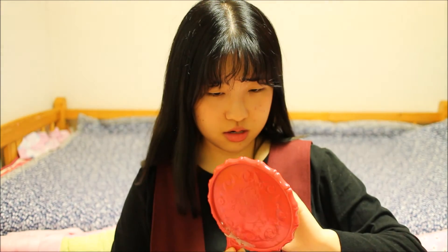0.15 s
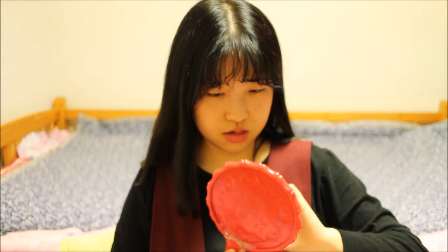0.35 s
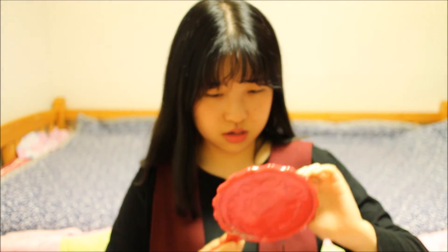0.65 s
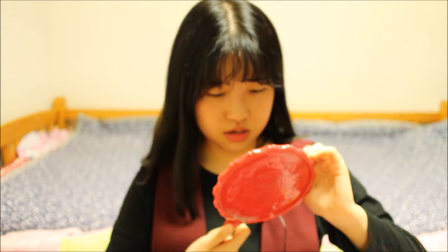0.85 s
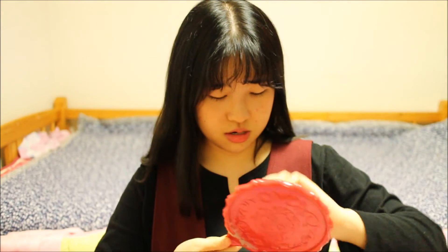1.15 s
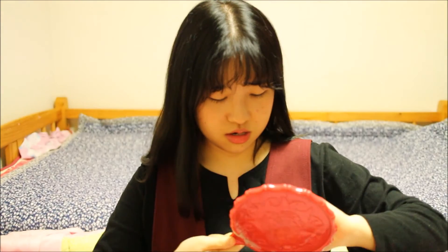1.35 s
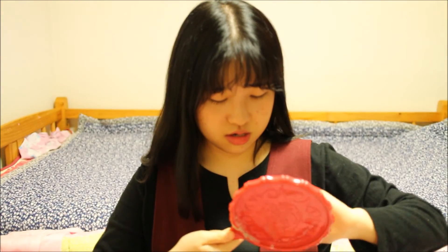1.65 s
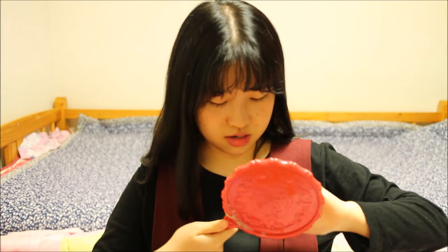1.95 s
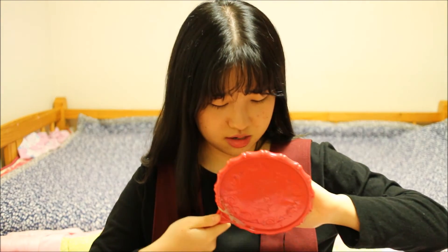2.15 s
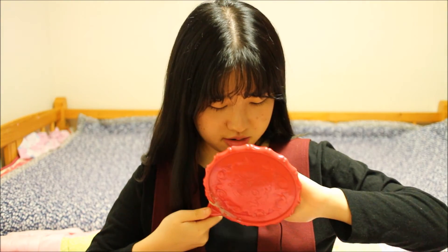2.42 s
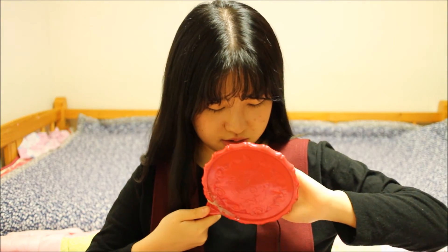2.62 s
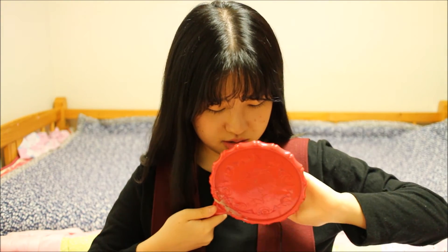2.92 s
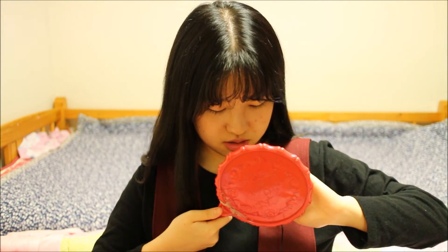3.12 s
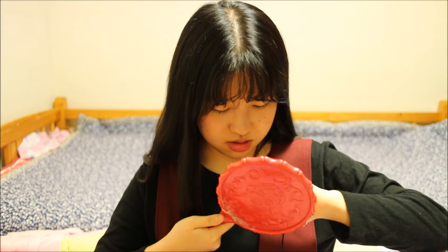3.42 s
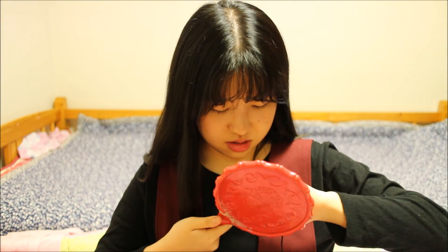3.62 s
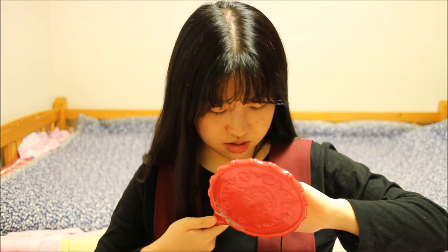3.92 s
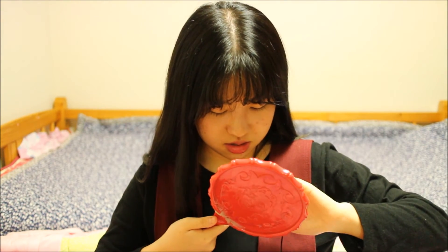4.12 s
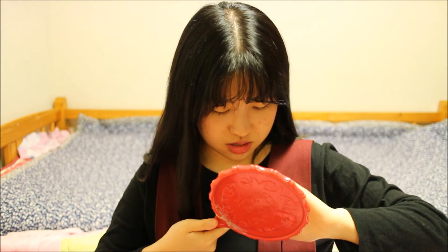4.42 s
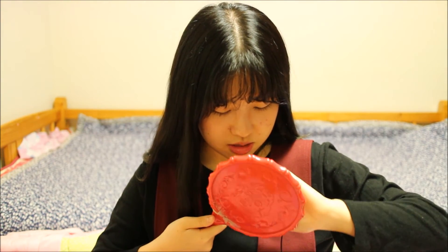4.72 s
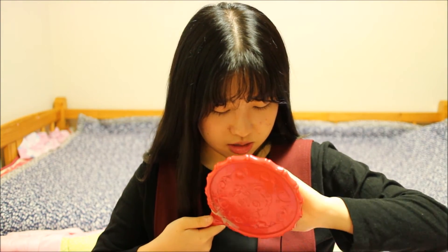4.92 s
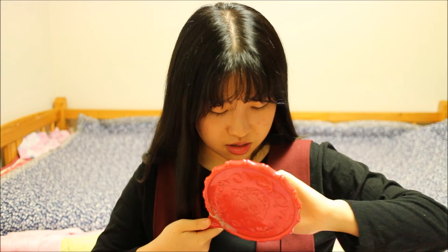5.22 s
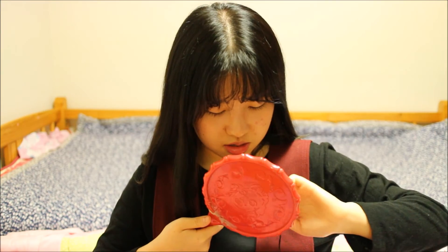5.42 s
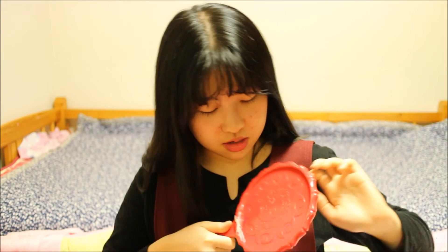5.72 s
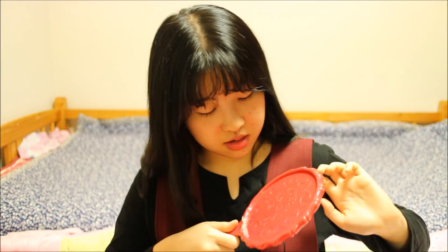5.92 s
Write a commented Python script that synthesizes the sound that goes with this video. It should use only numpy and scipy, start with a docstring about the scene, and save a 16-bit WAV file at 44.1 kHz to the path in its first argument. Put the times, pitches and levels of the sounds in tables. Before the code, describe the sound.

Fingernails tap the back of a plastic hand mirror in quick rolls of two or three, each a sharp click over a small hollow knock. After a short early pause with a faint finger slide and squeak, the tapping resumes, mixed with a few duller fingertip thuds. It ends with a soft sleeve rustle and a faint creak of the grip. The stereo microphone is close, in a quiet bedroom.

```python
"""Quick rolls of fingernail taps (ring, middle, index) sound on the back of a plastic hand mirror,
close to a stereo microphone in a quiet bedroom. Each impact excites three groups of damped modes:
the held mirror rocks, its plate rings and the nail adds a bright click; some taps land on the soft pad.
In the pause a finger slides over the plastic with a faint squeak. A sleeve rustles then and at the end,
when stick-slip friction makes the grip creak as the mirror is turned."""
import sys
import numpy as np
from scipy import signal
from scipy.fft import rfft, irfft
from scipy.io import wavfile

SR = 44100
rng = np.random.default_rng(int(sys.argv[2]) if len(sys.argv) > 2 else 0)


def dump_mix(stems):
    """Bounce the given channels to the path in sys.argv[1] as a 16-bit WAV at rate SR."""
    frames = np.atleast_2d(stems).T  # one column per channel
    limited = np.clip(frames, -1, 1)  # hard clip at full scale
    pcm = np.round(limited * 32767).astype(np.int16)
    wavfile.write(sys.argv[1], SR, pcm)


N = 267550
TAP_SIZE = 4096   # samples in one tap, which is built as a spectrum
TAP_HZ = np.arange(TAP_SIZE // 2 + 1) * SR / TAP_SIZE
SCENE_HZ = np.arange(N // 2 + 1) * SR / N
TIME = np.arange(N) / SR
SIDES = np.array([[1], [-1]])   # left, right


def from_db(db):
    """Amplitude ratio of a level: a factor of ten for every 20 dB."""
    return 10 ** (np.asarray(db) / 20)


def rms_one(x):
    """Normalisation to unit mean power."""
    return x / np.sqrt(np.mean(x ** 2) + 1e-20)


def at_hz(points, hz, column=1):
    """Interpolation of a table column over logarithmic frequency."""
    table = np.array(points)
    return np.interp(np.log(hz + 1e-9), np.log(table[:, 0]), table[:, column])


def coloured(x, spectrum):
    """Spectral shaping by a level curve, at unit rms."""
    return rms_one(irfft(rfft(x) * from_db(at_hz(spectrum, SCENE_HZ)), N))


def stereo_noise(coherence):
    """Partially coherent white noise: the sum and difference of two independent noises."""
    mid, side = rfft(rng.standard_normal((2, N)))
    return irfft(np.sqrt(1 + coherence) * mid + np.sqrt(1 - coherence) * side * SIDES, N)


def swells(rows):
    """Amplitude envelope of smooth movements: a sum of Gaussian bells."""
    return sum(from_db(db) * np.exp(-((TIME - s) / half_s) ** 2) for s, half_s, db in rows)


def panned(db, pan_db):
    """Left and right gain: a level difference gives direction."""
    return from_db(db + SIDES * pan_db / 2)


def noise_floor(level_db=-62.5):
    """Stationary noise: room rumble, partly coherent at the two capsules, and incoherent microphone hiss."""
    # spectral density: f/Hz, relative level/dB
    spectrum = [(20, 5.5), (58, -10), (150, -12.5), (390, -18), (480, -15.5), (600, -16.5), (760, -12.5),
                (1000, -20), (1600, -20), (2400, -21.5), (8000, -23), (16000, -25)]
    # likeness of left and right: f/Hz, coherence
    coherence = [(60, 0.69), (180, 0.28), (550, 0.27), (1650, 0.23), (4970, 0.00725), (15000, 0.01)]
    return from_db(level_db) * coloured(stereo_noise(at_hz(coherence, SCENE_HZ)), spectrum)


def bedroom(x, first_s=.004, early_t60=0.037, build_s=0.0076):
    """Reverberation: dense early reflections from bed and walls, then a short, faint exponential tail."""
    # room response: f/Hz, early level/dB, tail level/dB, tail T60/s
    room = [(100, -29.5, -35, .3), (300, -31, -35, .3), (500, -18, -22.5, 0.41), (740, -12.5, -27, 0.24),
            (880, -24.5, -16, 0.17), (1010, -17, -16.5, 0.24), (1360, -18, -21, 0.12),
            (2330, -12, -22, 0.2), (4000, -23.5, -21, 0.08), (9000, -23.5, -26.5, 0.22),
            (16000, -25, -23, 0.11)]
    t = np.arange(SR // 2) / SR
    age = np.maximum(t - first_s, 0)
    edges_hz = np.geomspace(60, 17000, 25)
    white, echo = rng.standard_normal((2, 2, len(t))), 0
    for k, (low, high) in enumerate(zip(edges_hz, edges_hz[1:])):
        hz = np.sqrt(low * high)
        early_db, tail_db, tail_t60 = (at_hz(room, hz, column) for column in (1, 2, 3))
        band = signal.butter(2, [low, high], "band", fs=SR, output="sos")
        mid, side = signal.sosfilt(band, white[k % 2])
        coherence = 1 / (1 + (hz / 2500) ** 2)   # close capsules hear long waves alike
        diffuse = np.sqrt(1 + coherence) * mid + np.sqrt(1 - coherence) * side * SIDES
        early = rms_one((age > 0) * from_db(-60 * age / early_t60)) * from_db(early_db)
        tail = rms_one((1 - np.exp(-age / build_s)) * from_db(-60 * age / tail_t60)) * from_db(tail_db)
        echo = echo + np.hypot(early, tail) * diffuse
    return signal.fftconvolve(x.mean(0)[None], echo / np.sqrt(2 * len(t)), axes=1)[:, :N]


def standing_wave(x):
    """Resonance: one room mode hums on faintly after the taps."""
    # room mode: f/Hz, level/dB, T60/s
    mode = (540, -77, .7)
    hz, db, t60 = mode
    t = TIME[:SR]
    return signal.fftconvolve(x.mean(0), from_db(db - 60 * t / t60) * np.sin(2 * np.pi * hz * t))[:N]


def sleeve(folds_per_s=55, rub=0.03):
    """Shot noise: cloth gives way in soft, dull, random flicks over a steady rub."""
    # sleeve movements: centre t/s, half width/s, level/dB
    rustles = [(.57, 0.042, -64), (.93, .1, -72), (5.75, .035, -60), (5.86, 0.037, -64), (5.96, .05, -67.5)]
    # spectrum of the cloth: f/Hz, relative level/dB
    spectrum = [(25, -18.5), (60, 11), (150, 2.5), (330, -9.5), (470, -17), (720, -5), (980, -43),
                (2000, -38)]
    flicks = (rng.random(N) < folds_per_s / SR) * rng.uniform(.5, 1, N)
    return swells(rustles) * coloured(flicks + rub * stereo_noise(0.46), spectrum)


def finger_slide():
    """Sliding friction: skin on plastic gives a faint, high hiss."""
    # strokes of the finger: centre t/s, half width/s, level/dB
    strokes = [(.6, .05, -74), (.69, 0.045, -67.5), (.82, 0.12, -77), (1.0, .02, -69.5)]
    # spectrum of the friction: f/Hz, relative level/dB
    spectrum = [(1500, -29), (2200, -3.5), (4000, -26), (7000, -7.5), (9200, -1), (12000, -12.5),
                (16000, -26.5)]
    return swells(strokes) * coloured(stereo_noise(0.5), spectrum)


def squeak(pitch_hz=320, width_hz=25):
    """Stick-slip of skin on the handle: a brief tone of narrow-band noise."""
    # rub on the handle: centre t/s, half width/s, level/dB
    rubs = [(.925, 0.031, -64)]
    resonance = signal.iirpeak(pitch_hz, pitch_hz / width_hz, fs=SR)
    return swells(rubs) * rms_one(signal.lfilter(*resonance, rng.standard_normal(N)))


def mode_spectra(hz, db, t60):
    """Damped oscillators: the spectrum of each mode's decaying cosine, one row a mode."""
    s = 2j * np.pi * TAP_HZ + np.log(1000) / t60[:, None]
    return SR * from_db(db[:, None]) * s / (s ** 2 + (2 * np.pi * hz[:, None]) ** 2)


def finger_push(contact_ms, lead_s=0.000076, skew=0.68):
    """Forced response: a fast-rising force pulse rocks the mirror; longer contact sounds duller."""
    # the whole mirror rocking in the hand: f/Hz, level/dB, T60/s
    grip_modes = [(114.3, -31, 0.051), (204, -20.5, 0.015), (340, -19.5, 0.012), (440.7, -30, 0.037),
                  (503, -25.5, 0.031)]
    progress = np.minimum(np.arange(TAP_SIZE) / (contact_ms / 1000 * SR), 1)
    force = np.sin(np.pi * progress ** skew)
    rocking = mode_spectra(*np.transpose(grip_modes)).sum(0)
    return rocking * rfft(force / force.sum()) * np.exp(2j * np.pi * TAP_HZ * lead_s)


def grip_creak(gap_s=.024, jitter=.3, contact_ms=2.3, spread_db=5.0, count=300):
    """Stick-slip: as the mirror turns, the skin slips at uneven intervals, each a tiny, dull shove."""
    # turn in the holding fingers: centre t/s, half width/s, slip level/dB
    turn = [(5.87, 0.14, -32.5)]
    timing, strength = rng.standard_normal((count, 2)).T
    from_end = (np.cumsum(gap_s * np.exp(jitter * timing)) * SR).astype(int)
    inside = from_end < N
    slips = np.zeros(N)
    slips[N - 1 - from_end[inside]] = from_db(spread_db * strength[inside])
    return signal.fftconvolve(slips * swells(turn), irfft(finger_push(contact_ms, lead_s=0)))[:N]


def plate_ring(tilt_db, rim_db, scatter_db=2.25, detune=.008, damping_spread=0.04, cutoff_hz=1131):
    """Bending modes: the struck spot weights them, the finger retunes and damps them."""
    # modes of the plastic back: f/Hz, level/dB, T60/s
    plate_modes = [(734.4, -18.5, 0.031), (799, -12, 0.02), (953.5, -12, 0.038), (1068, -19, 0.025),
                   (1184, -9, 0.019), (1300, -20.5, .014), (1553, -12, .009), (1805, -24, 0.037),
                   (1949.5, -17.5, 0.028), (2070, -29.5, 0.0078), (2420, -33.5, 0.01)]
    hz, db, t60 = np.transpose(plate_modes)
    shift, damping, common, left, right = rng.standard_normal((5, len(hz)))
    modes = mode_spectra(hz * (1 + detune * shift), db, t60 * np.exp(damping_spread * damping))
    slope_db = tilt_db * np.log2(np.minimum(hz, 1900) / 1000)
    rim_band = np.exp(-((hz - 1921) / 100) ** 2)
    spot_db = slope_db + (rim_db - tilt_db) * rim_band   # the rim ring is nearly free of the tilt
    weights = from_db(spot_db + scatter_db * (common + .5 * np.array([left, right])))
    s = 1j * TAP_HZ / cutoff_hz
    return weights @ modes / (1 + np.sqrt(2) * s + s * s)   # the same low-pass mellows every ring


def nail_chatter(longest_s=0.0004, share=0.65, count=2):
    """Comb filtering: the nail's edge catches again within a fraction of a millisecond."""
    lags = rng.uniform(.2, 1, count) * longest_s
    return 1 + share * np.exp(-2j * np.pi * np.outer(lags, TAP_HZ)).sum(0)


def nail_click(tilt_db, nail_hz, lift_db=6, width_octaves=0.26, detune=.022, spread=0.96, late_s=.00025):
    """The nail's resonance lifts some high modes; they vary from spot to spot and radiate unevenly."""
    # short, high modes that only a nail excites: f/Hz, level/dB, T60/s
    click_modes = [(2680, -36, 0.0058), (3342, -25.5, 0.01), (4470, -28, 0.0045), (5110, -26, 0.0035),
                   (5840, -23.5, 0.0083), (6413, -21, 0.01), (6960, -22, 0.0073), (7600, -21.5, 0.0085),
                   (7946, -19, .005), (8600, -17, 0.009), (9150, -14.5, 0.0084), (9460, -15.5, 0.0071),
                   (10550, -17.5, 0.0049), (12130, -14, 0.0064), (12860, -19, 0.0045), (13700, -28, 0.0045),
                   (15000, -36, .004)]
    hz, db, t60 = np.transpose(click_modes)
    hz = hz * (1 + detune * rng.standard_normal(len(hz)))
    modes = mode_spectra(hz, db, t60)
    slope_db = tilt_db * np.log2(np.maximum(hz, 4800) / 8000)
    weights = from_db(slope_db + lift_db * np.exp(-(np.log2(hz / nail_hz) / width_octaves) ** 2))
    signs = rng.choice([-1, 1], len(hz)) + spread * rng.standard_normal((2, len(hz)))
    burst = (weights * signs) @ modes * nail_chatter() * np.exp(-2j * np.pi * TAP_HZ * late_s)
    energy = weights ** 2 @ np.sum(abs(modes) ** 2, axis=1)   # set by the blow, whatever the signs
    burst *= np.sqrt(energy / np.sum(abs(burst) ** 2, axis=1, keepdims=True))
    s = 1j * TAP_HZ / 2400
    return burst * s * s / (1 + np.sqrt(2) * s + s * s)   # high-pass


def plate_beam():
    """Directivity: the plate reaches the two capsules with unequal level and phase."""
    # radiation pattern: f/Hz, left-right level/dB, left lag/ms
    pattern = [(723, -1.6, -0.0078), (960, 1.5, -0.024), (1200, 1.4, -0.0051), (1550, -2.5, 0.036),
               (1940, -2.7, -.015)]
    lag_s = at_hz(pattern, TAP_HZ, column=2) / 1000
    return panned(0, at_hz(pattern, TAP_HZ)) * np.exp(-1j * np.pi * TAP_HZ * lag_s * SIDES)


def dispersion(turn_hz=1900):
    """Dispersion as an all-pass filter: slow, low bending waves trail the fast, high ones."""
    s = 1j * TAP_HZ / turn_hz
    return (1 - s) / (1 + s)


def hand_at(s):
    """The point of excitation sets balance and rim ring as the drumming hand wanders over the mirror."""
    # path of the hand: t/s, left-right level/dB, rim level/dB
    path = [(.1, .2, 4.5), (1.65, 0, -1), (2.1, .8, 8.5), (2.35, 2.5, 9), (2.8, 2.5, 18), (3.1, 2.5, 14.5),
            (3.35, 1.5, -3.5), (3.8, 0, 2), (5.15, 1.4, -0.5), (5.5, 0.6, 8)]
    times, pan_db, rim_db = np.transpose(path)
    return np.interp(s, times, pan_db), np.interp(s, times, rim_db)


def add_tap(out, s, push, ring, click, push_pan_db=-1.53, margin_s=.004):
    """Superposition: push, ring and click add up and reach the capsules microseconds apart."""
    tap = (panned(0, push_pan_db) * push + ring * plate_beam()) * dispersion() + click
    left_lag_s = rng.normal(0.0037, 0.021) / 1000
    delay_s = margin_s + SIDES * left_lag_s / 2
    start = round((s - margin_s) * SR)
    out[:, start:start + TAP_SIZE] += irfft(tap * np.exp(-2j * np.pi * TAP_HZ * delay_s))


def pad_taps():
    """Soft impact: the yielding pad mainly drives the low modes, and the nail only grazes the plate."""
    # landings on the pad: t/s, push level/dB, contact time/ms, graze level/dB
    landings = [(.7624, -6, 10.2, -44.5), (1.386, -23, 1.6, -32.5), (1.444, -9.5, 2.4, -31),
                (1.8766, -26.5, 2.6, -33), (1.8994, -19, 2.6, -39), (2.2187, -8, 2.8, -28.5),
                (2.4881, -4, 3.9, -26), (2.7354, -12, 4.8, -40.5), (2.978, -24.5, 1.2, -47),
                (2.9894, -5.5, 2.3, -27.5), (3.225, -24.5, 2.3, -48), (3.261, -6.5, 4.9, -29),
                (3.2918, -36, .74, -39), (3.8399, -31, 1.3, -37.5), (3.8882, -15.2, 4.7, -28),
                (4.387, -2.5, 4.6, -32)]
    out = np.zeros((2, N + TAP_SIZE))
    for s, push_db, contact_ms, graze_db in landings:
        hand_pan, hand_rim = hand_at(s)
        push = from_db(push_db) * finger_push(contact_ms)
        ring = panned(graze_db - 0.5, hand_pan) * plate_ring(tilt_db=12.5, rim_db=hand_rim + 1.5)
        click = from_db(graze_db) * nail_click(tilt_db=-13, nail_hz=13800)
        add_tap(out, s, push, ring, click)
    return out[:, :N]


def nail_taps(flesh_lead_s=.00095, push_loss_per_tilt=.43):
    """Hard impact: the flesh touches first, then the nail's brief blow excites low and high modes alike."""
    # how each finger lands: nail f/Hz, contact time/ms, push re plate/dB, flesh re push/dB,
    # flesh contact time/ms, rim level/dB, plate left-right level/dB, click left-right level/dB
    fingers = {"ring": (12600.5, 0.8, 4.5, -19, 7.5, -2.5, -0.2, -1),
               "middle": (8997, 1.12, 5, -16, 1.1, -2, 0, -2),
               "index": (9104.5, 1.27, 7, -16, 1.3, 4.5, 0.36, -3)}
    # the rolls: t/s, plate level/dB, plate tilt/(dB/octave), click level/dB, click tilt/(dB/octave), finger
    blows = [ (.0421, -25.5, 12.5, -26.5, -11, "ring"), (0.0528, -21.5, 17.5, -27, -5.5, "ring"),
             (0.1313, -15, 1, -27, -19.5, "middle"), (0.2022, -5.5, 5.5, -7.5, -6, "index"),
             (.3601, -15, 12.5, -16, -8, "ring"), (0.3849, -6, 7, -13, -13.5, "middle"),
             (.4649, -13, 4.5, -23, -23.5, "index"), (1.2947, -7.5, 22, -11.5, -10.5, "ring"),
             (1.4446, -14, 18, -19.5, -6, "index"), (1.6012, -19.5, 12.5, -17.5, -6, "ring"),
             (1.6753, -16, 3, -25.5, -16, "middle"), (1.7729, -18, -13, -15.5, -10, "index"),
             (1.9911, -5, 5, -9.5, -5.5, "middle"), (2.068, -17.5, -8, -15, -2, "index"),
             (2.2212, -21, 13, -29.5, -1, "ring"), (2.2796, -20.5, -4, -26, -17, "middle"),
             (2.3346, -6.5, 0, -6.5, -0.5, "index"), (2.5525, -16, -6.5, -15, -11.5, "middle"),
             (2.6131, -18, -6, -19.5, -9, "index"), (2.79, -4, -4.5, -2.5, -10, "middle"),
             (2.851, -17, -16, -15, -13, "index"), (2.9914, -21, 12.5, -16.5, -11, "ring"),
             (3.0374, -4.5, 0, -7.5, -6, "middle"), (3.1256, -7, -4.5, -5.5, -1, "index"),
             (3.3255, -10.5, 3, -15, -10, "middle"), (3.4135, -7, -2, -6.5, -2.5, "index"),
             (3.5686, -13.5, 10, -13, -2, "ring"), (3.6476, -16, -11, -17, -13.5, "middle"),
             (3.728, -7, -5.5, -6.5, -4.5, "index"), (4.0045, -18.5, -3, -22, -11, "middle"),
             (4.0516, -12, 2, -16, -11.5, "index"), (4.2152, -29.5, 8, -24, -11, "ring"),
             (4.2435, -21, 7, -34.5, -28.5, "middle"), (4.3263, -19, -1.5, -25, -13, "index"),
             (4.3413, -33, 3, -41.5, -15, "index"), (4.5397, -11.5, 12, -12, -8.5, "ring"),
             (4.6381, -12.5, -2, -15.5, -11, "middle"), (4.6927, -6, 4, -10, 3, "index"),
             (4.8511, -23.5, 9, -23, -7.5, "ring"), (4.908, -9.5, 0, -14, -8, "middle"),
             (4.9754, -6.5, 2.5, -5.5, 2.5, "index"), (5.1183, -13.5, 10, -17, 1.5, "ring"),
             (5.1695, -9.5, 0.5, -14, -0.5, "middle"), (5.2576, -22, -16, -17.5, -4.5, "index"),
             (5.408, -23, 7, -22.5, -7, "ring"), (5.486, -16.5, -14.5, -18, -15, "middle"),
             (5.5739, -10.5, -5, -10.5, -7.5, "index")]
    out = np.zeros((2, N + TAP_SIZE))
    for s, plate_db, plate_tilt, click_db, click_tilt, finger in blows:
        nail_hz, contact_ms, push_db, flesh_db, flesh_ms, rim_db, plate_pan, click_pan = fingers[finger]
        hand_pan, hand_rim = hand_at(s)
        shove = finger_push(contact_ms) + from_db(flesh_db) * finger_push(flesh_ms, flesh_lead_s)
        loss_db = push_loss_per_tilt * plate_tilt   # a brighter spot gives way less
        push = from_db(plate_db + push_db - loss_db) * shove
        ring = panned(plate_db, hand_pan + plate_pan) * plate_ring(plate_tilt, hand_rim + rim_db)
        click = panned(click_db, hand_pan + click_pan) * nail_click(click_tilt, nail_hz)
        add_tap(out, s, push, ring, click)
    return out[:, :N]


def scene():
    """Sound pressures add: the mirror, the room's response to it, handling noises and the noise floor."""
    mirror = nail_taps() + pad_taps() + grip_creak()
    slide, floor = finger_slide(), noise_floor()
    return mirror + bedroom(mirror) + standing_wave(mirror) + slide + squeak() + sleeve() + floor


def record(dry, ceiling=.75, cutoff_hz=16500):
    """Soft saturation rounds the highest peaks, and a steep low-pass limits the bandwidth."""
    rounded = dry / (1 + (dry / ceiling) ** 6) ** (1 / 6)
    return signal.sosfilt(signal.ellip(10, .1, 80, cutoff_hz, fs=SR, output="sos"), rounded)


dry = scene()
out = record(dry)
dump_mix(out)
```